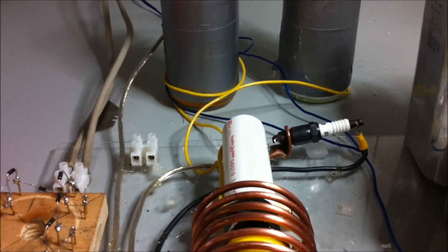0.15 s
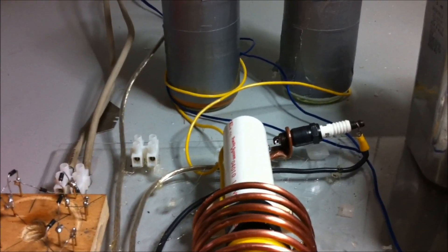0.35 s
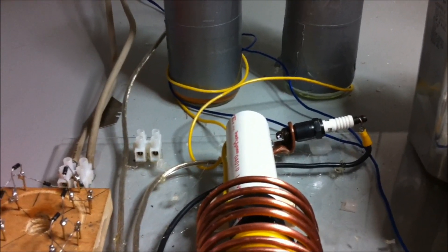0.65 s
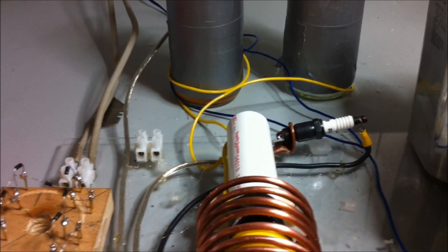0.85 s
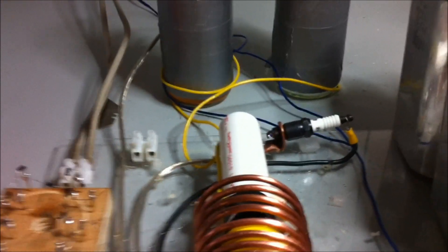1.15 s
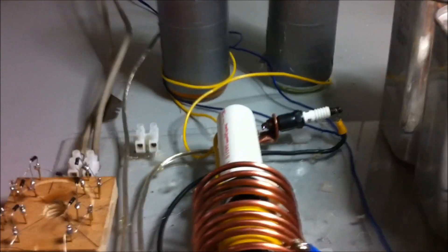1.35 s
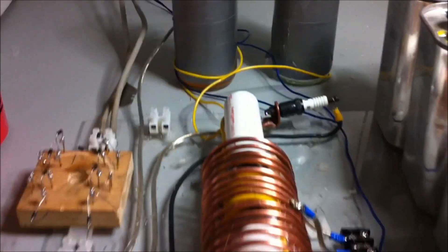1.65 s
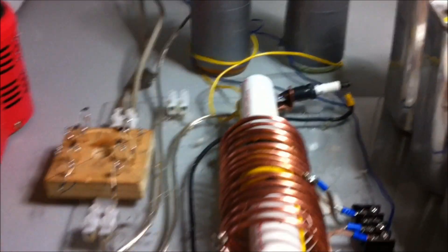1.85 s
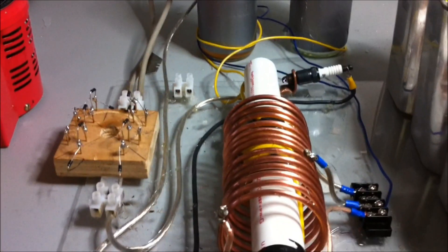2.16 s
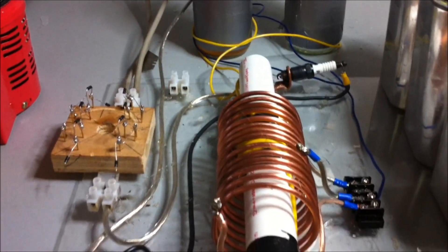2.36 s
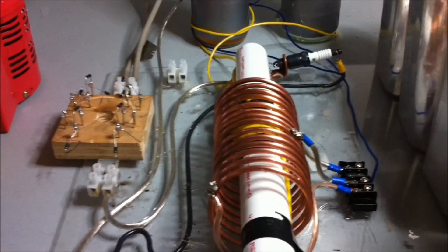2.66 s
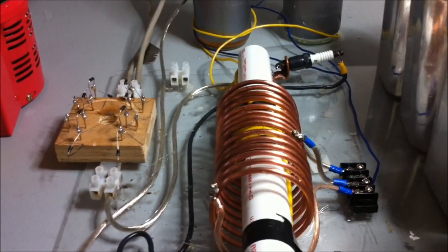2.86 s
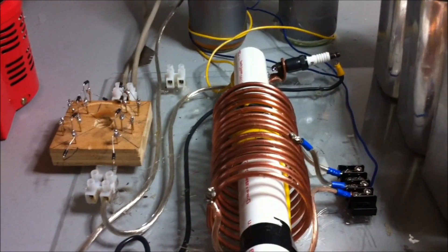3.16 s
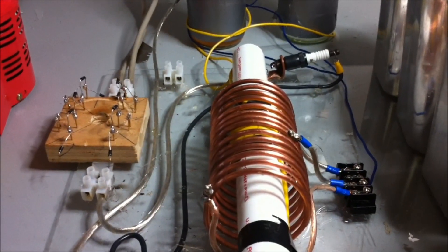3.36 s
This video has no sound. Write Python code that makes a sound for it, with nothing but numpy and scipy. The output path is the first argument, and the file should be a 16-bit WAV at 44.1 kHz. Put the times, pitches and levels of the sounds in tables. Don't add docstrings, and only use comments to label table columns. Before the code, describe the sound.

A high-voltage electric spark buzzes and crackles continuously across a spark plug gap, harsh and bright.

```python
import sys
import numpy as np
from scipy import signal
from scipy.fft import rfft, irfft
from scipy.io import wavfile
from scipy.ndimage import uniform_filter1d

SR = 44100
rng = np.random.default_rng(int(sys.argv[2]) if len(sys.argv) > 2 else 0)


def to_wav(s):
    ch = np.atleast_2d(s).T
    pcm = np.round(np.clip(ch, -1, 1) * 32767)
    wavfile.write(sys.argv[1], SR, pcm.astype(np.int16))


def level_to_linear(level):
    exponent = np.asarray(level, float) / 20
    return 10 ** exponent


N = 154350
HALF_CYCLE_HZ = 120.033


def level(x, db):
    return x * level_to_linear(db) / np.sqrt(np.mean(x ** 2))


def colour_db(hz, table):
    table = np.array(table)
    return np.interp(np.log(hz + 1), np.log(table[:, 0]), table[:, 1])


def causal(db):
    cepstrum = irfft(db * np.log(10) / 20)
    half = len(cepstrum) // 2
    cepstrum[1:half] *= 2
    cepstrum[half + 1:] = 0
    return irfft(np.exp(rfft(cepstrum)))


def walk(rate_hz):
    hold = int(SR / rate_hz)
    steps = np.repeat(rng.standard_normal(N // hold + 1), hold)
    return 0.83 * uniform_filter1d(uniform_filter1d(steps, hold), hold)[:N]


def clicks(times_s, sizes):
    i = np.round(times_s.ravel() * SR).astype(int)
    ok = (i >= 0) & (i < N)
    return np.bincount(i[ok], sizes.ravel()[ok], N)


def workshop_murmur():
    # hz, level_db
    murmur_curve = [(53, -49), (90, -12.5), (188, -7.5), (237, -4), (361, -12.5), (600, -16.5), (2600, -24),
                    (4500, -50)]
    hz = np.fft.rfftfreq(N, 1 / SR)
    murmur = irfft(rfft(rng.standard_normal(N)) * level_to_linear(colour_db(hz, murmur_curve)), N)
    return level(murmur * level_to_linear(2.0 * walk(5.17)), -59)


def transformer_hum():
    # pitch_hz, rms_db
    partials = [(120.033, -75), (240.066, -60), (300.08, -71.5)]
    t = np.arange(N) / SR
    hum = np.zeros(N)
    for pitch_hz, rms_db in partials:
        gain = np.sqrt(2) * level_to_linear(rms_db + 0.23 * walk(4.9))
        hum += gain * np.cos(2 * np.pi * pitch_hz * t + 1.62)
    return hum


def handling_rumble():
    # time_s, level_db
    rumble_curve = [(0.0, -70), (0.07, -57), (0.21, -82), (1.0, -92), (1.04, -74), (1.26, -82), (1.29, -76),
                    (3.07, -67), (3.5, -77)]
    band = signal.butter(2, [22, 85], "bandpass", fs=SR, output="sos")
    lumps = signal.sosfilt(band, rng.standard_normal(N)) * level_to_linear(3.5 * walk(8.7))
    t = np.arange(N) / SR
    return level(lumps, -2.0) * level_to_linear(np.interp(t, *np.array(rumble_curve).T))


def reflection_envelope(size):
    t = np.arange(size) / SR
    total = np.zeros(size)
    for tail_db, t60_s in ((-3, .013), (-9, .2)):
        power = level_to_linear(-60 * t / t60_s) ** 2
        total += level_to_linear(tail_db) ** 2 * power / power.sum()
    return np.sqrt(total)


def path_colour_db(broad, peaks, depth, hz):
    db = colour_db(hz, broad) - 10 * np.log10(1 + (380 / (hz + 1)) ** 4)
    for centre_hz, width_hz, peak_db in peaks:
        db = db + depth * peak_db * np.exp(-.5 * (2 * (hz - centre_hz) / width_hz) ** 2)
    return db


def place_colours_db(hz):
    # hz, level_db
    near_broad = [(400, -13.5), (800, -10), (1600, -16), (3200, -14.5), (5500, -5.5), (8500, -7),
                  (12000, -0.76), (15700, -0.6)]
    midway_broad = [(400, -19), (800, -13.5), (1600, -12.5), (3200, -16), (5500, -4), (8500, -3.5),
                    (12000, -1.9), (15700, -2)]
    far_broad = [(400, -15), (800, -16), (1600, -8.5), (3200, -16), (5500, -5.5), (8500, -4.5), (12000, -2),
                 (15700, -2)]
    # centre_hz, width_hz, peak_db
    near_peaks = [(465, 210, -9.5), (1090, 97, 3.5), (1262, 210, 12), (2566, 43, 8.5), (2980, 90, 7.5),
                  (3460, 600, -1.5), (3789, 133, 9), (4880, 120, -10), (6830, 280, 6), (7460, 150, 7.5),
                  (8000, 114, 7.5), (8800, 360, 1.5), (10200, 350, 1), (7100, 200, -3)]
    midway_peaks = [(1090, 84, 4.5), (1272, 230, 10.5), (1700, 440, -2), (2090, 49, 8.5), (2550, 290, 3),
                    (3920, 82, 7), (4430, 62, 6.5), (5150, 770, -4.5), (6760, 150, -6), (7140, 83, 3.5),
                    (9700, 150, -4), (10400, 280, 4), (13300, 240, 3), (13000, 240, 4)]
    far_peaks = [(1007, 140, -5), (1558, 150, -9), (1850, 51, 7), (2820, 290, 4.5), (3962, 78, -12),
                 (4970, 67, -13), (6400, 93, -3.5), (6690, 240, 7), (7230, 370, -6), (8560, 290, 3.5),
                 (8800, 270, 3.5), (9660, 620, 3.5), (11900, 220, 1), (13500, 630, 5.5)]
    # centre_hz, width_hz, peak_db
    near_comb = [(8800, 200, -5), (9800, 150, -5), (11100, 200, -4), (12400, 200, 2.5), (12650, 150, -5),
                 (12900, 250, 2.5), (13500, 350, 3.5), (14000, 250, -5), (14310, 250, 4), (14650, 200, -3),
                 (15000, 200, 2.5), (15250, 150, -3), (15480, 200, 4)]
    midway_comb = [(11500, 300, 1.5), (12400, 300, -2.5), (14500, 500, 1.5), (15600, 200, 1.5)]
    far_comb = [(8400, 250, -4), (10100, 200, -2.5), (11200, 300, -3.5), (12300, 300, -4), (13000, 200, -3),
                (13250, 200, 1.5), (14300, 300, -2.5), (15150, 300, 2.5), (15700, 200, 1.5)]
    peak_depth = [0.9135, 1.08, 0.9857]
    paths = [(near_broad, near_peaks + near_comb),
             (midway_broad, midway_peaks + midway_comb),
             (far_broad, far_peaks + far_comb)]
    return np.array([path_colour_db(*path, depth, hz) for path, depth in zip(paths, peak_depth)])


def place_shares(time_s):
    # start_s, end_s
    moves = [
        (1.2, 1.47),
        (1.72, 2.154),
    ]
    a, b = (np.clip((time_s - start_s) / (end_s - start_s), 0, 1) for start_s, end_s in moves)
    return np.array([1 - a, a * (1 - b), b])


def half_cycles(drift_db):
    # time_s, over_neighbours_db
    uneven = [(0.0841, 3.1), (0.1, -3.0), (0.1666, -3.0), (0.2583, -3.2), (0.2666, -2.7), (0.2832, -2.4),
              (0.3082, -2.4), (0.3838, 4.7), (0.4841, 2.7), (0.7014, 3.4), (0.7165, -2.5), (0.7251, 3.2),
              (0.8586, 4.3), (0.8747, -2.7), (0.9253, 3.0), (0.9333, 2.9), (0.9914, -2.7), (1.0675, 3.1),
              (1.1834, 2.4), (1.358, -2.4), (1.3663, -2.7), (1.4088, 3.7), (1.4413, -2.9), (1.4496, -3.0),
              (1.5845, 2.6), (1.6162, -3.0), (1.6345, 3.5), (1.8245, -2.5), (1.8412, -3.6), (1.9094, 3.0),
              (1.9495, -3.1), (1.9578, -4.0), (1.9661, -3.3), (2.0248, 2.9), (2.0661, -3.2), (2.0744, -4.4),
              (2.1411, -4.2), (2.1583, 2.5), (2.1744, -2.8), (2.2077, -2.5), (2.2341, 3.3), (2.2502, 3.2),
              (2.3669, 3.3), (2.3839, 3.0), (2.5169, 3.1), (2.7409, -2.4), (2.7749, 3.0), (2.8503, 2.4),
              (2.9415, 4.3), (2.9499, 2.8), (2.9908, -2.7), (3.1001, 3.1), (3.3006, 2.4), (3.3574, -3.7),
              (3.3834, 2.6), (3.3911, 2.9), (3.4407, -6.2), (3.449, -2.4), (3.4579, 2.9), (3.4835, 2.7)]
    first_s, jitter_s, polarity_s = -.0004, .00015, .0006
    start_s = first_s + np.arange(int(N / SR * HALF_CYCLE_HZ) + 2) / HALF_CYCLE_HZ
    charge, jitter, stretch = rng.standard_normal((3, len(start_s)))
    limited = np.tanh(charge) - 0.41 * np.clip(-charge - 1, 0, 2)
    db = 1.83 * limited + np.interp(start_s, np.arange(N) / SR, drift_db)
    swing = 1. * (np.arange(len(start_s)) % 2 == 0)
    shift_s = jitter_s * jitter + polarity_s * swing
    for time_s, over_db in uneven:
        k = int(round((time_s - first_s) * HALF_CYCLE_HZ))
        if over_db > 0:
            db[k] = over_db * 1.2
            shift_s[k] = time_s - start_s[k] - .0009
        else:
            db[k] = over_db * 1.6
    stretch_db = 1.2 * stretch + .4 * db
    return start_s + shift_s, db, stretch_db, swing


def restrike_flurry(start_s, db, stretch_db):
    shape = (len(start_s), 20)
    flurry_s = .0034
    late_s = flurry_s * rng.beta(1.8, 2.4, size=shape) * level_to_linear(stretch_db[:, None])
    sizes = level_to_linear(db[:, None] + 4.0 * rng.standard_normal(shape)) * rng.choice([-1, 1], shape)
    return level(clicks(start_s[:, None] + late_s, sizes), 0)


def first_strike(start_s, db, swing):
    polarity_db = 2.5
    strike = clicks(start_s, level_to_linear(0.78 * db + polarity_db * swing))
    return level(signal.lfilter(*signal.butter(2, 1720, fs=SR), strike), -13)


def sizzle(drift_db):
    return level(rng.standard_normal(N) * level_to_linear(drift_db + 1.9 * walk(900)), -8)


def arc():
    # time_s, level_db
    strength = [(0.0, -24), (0.05, -30.5), (0.1, -24.5), (0.24, -26.5), (1.06, -28), (1.2, -25),
                (1.27, -29.5), (1.43, -25), (1.55, -27), (2.27, -26.5), (2.44, -30), (2.67, -25),
                (2.77, -28), (2.78, -24.5), (2.89, -29), (3.27, -26.5), (3.41, -31.5), (3.5, -28.5)]
    drift_db = 0.27 * walk(24.17)
    start_s, db, stretch_db, swing = half_cycles(drift_db)
    sparks = restrike_flurry(start_s, db, stretch_db) + first_strike(start_s, db, swing) + sizzle(drift_db)
    return sparks * level_to_linear(np.interp(np.arange(N) / SR, *np.array(strength).T))


def scene():
    place_db = [-0.27, -0.7, -0.34]
    size, step = 8192, 2 * SR / HALF_CYCLE_HZ
    still_rad_s, moving_rad_s = 16, 20
    direct, notch_depth_db, notch_rarity, notch_from_hz = 0.67, 22, 1.35, 2800
    hz = np.fft.rfftfreq(size, 1 / SR)
    colours_db = place_colours_db(hz)
    sparks, tail = arc(), reflection_envelope(size)
    out = np.append(transformer_hum() + workshop_murmur() + handling_rumble(), np.zeros(2 * size))
    ripple = 0.28 * np.clip(hz / 3400 - 1, 0, 1)
    chance = rng.standard_normal(size)
    edges = np.clip((np.arange(int(N / step) + 3) * step - step / 8).astype(int), 0, N)
    for i, j in zip(edges[:-1], edges[1:]):
        share = place_shares(i / SR)
        turn_rad = (still_rad_s + moving_rad_s * share[1]) * step / SR
        chance = np.cos(turn_rad) * chance + np.sin(turn_rad) * rng.standard_normal(size)
        echo = rfft(np.append(direct, (chance * tail)[1:]))
        power = np.abs(echo) ** 2
        fine_db = 10 * np.log10(uniform_filter1d(power, size=18))
        broad_db = 10 * np.log10(uniform_filter1d(power, size=140))
        patchy = uniform_filter1d(uniform_filter1d(chance[-len(hz):], size=28), size=28)
        notch_db = notch_depth_db * np.clip(patchy / patchy.std() - notch_rarity, 0, 1) * (hz > notch_from_hz)
        flatten_db = (1 - ripple) * fine_db + ripple * broad_db
        path = echo * rfft(causal(share @ colours_db - notch_db - flatten_db))
        response = irfft(path) * level_to_linear(share @ place_db) / np.sqrt(np.mean(np.abs(path) ** 2))
        if j > i:
            out[i:j + size - 1] += signal.fftconvolve(sparks[i:j], response)
    return out[None, :N]


def band_limit(x):
    return signal.sosfilt(signal.butter(12, 17060, fs=SR, output="sos"), x)


def record(dry):
    # start_s, length_s
    dropouts = [(.158, .01), (.308, .006), (.376, .036), (.434, .022), (.708, .008), (.728, .008),
                (.858, .016), (1.393, .01), (1.413, .005), (1.432, .006), (1.463, .026), (1.507, .008),
                (1.59, .009), (1.618, .022), (2.096, .014), (2.212, .018), (2.686, .012), (3.109, .007)]
    t = np.arange(N) / SR
    gate = sum(1. * ((t > start_s) & (t < start_s + length_s)) for start_s, length_s in dropouts)
    gate = np.clip(uniform_filter1d(gate, size=130), 0, 1)
    x = .4 * np.tanh(dry / .4)
    bass = signal.sosfiltfilt(signal.butter(4, 480, fs=SR, output="sos"), x)
    x = x - 0.98 * gate * bass
    hz = np.fft.rfftfreq(N, 1 / SR)
    top_hz, slope_db_per_hz = 15770, .4
    x = irfft(rfft(x) * level_to_linear(-np.clip(hz - top_hz, 0, 250) * slope_db_per_hz), N)
    return band_limit(x)


dry = scene()
out = record(dry)
to_wav(out)
```